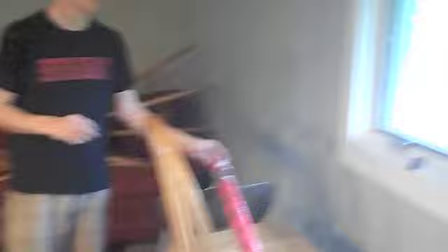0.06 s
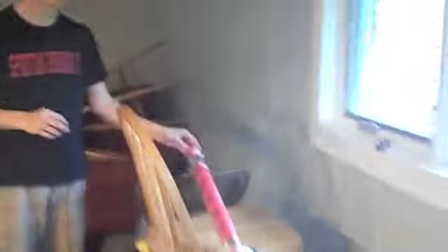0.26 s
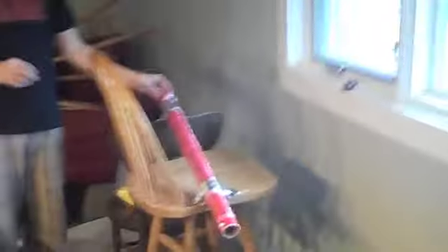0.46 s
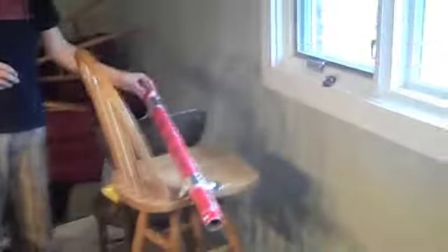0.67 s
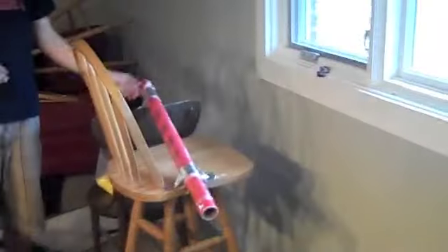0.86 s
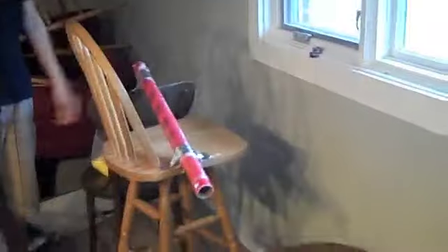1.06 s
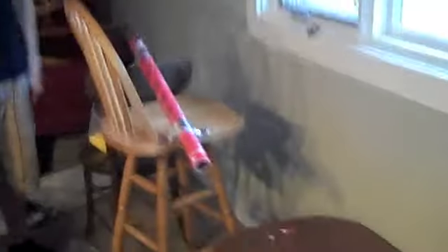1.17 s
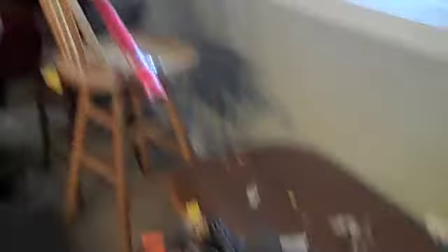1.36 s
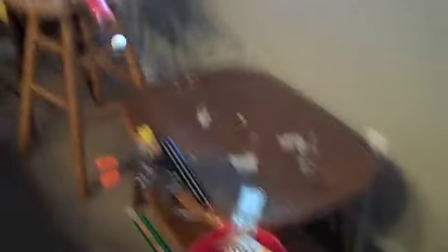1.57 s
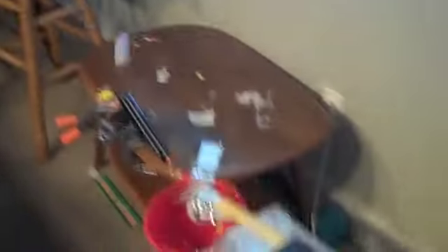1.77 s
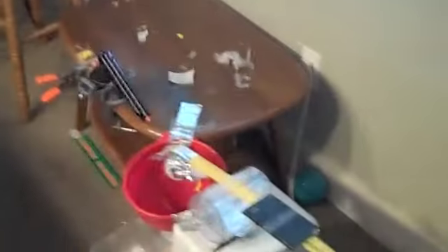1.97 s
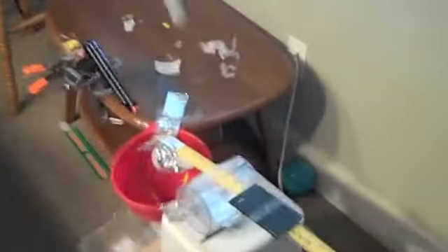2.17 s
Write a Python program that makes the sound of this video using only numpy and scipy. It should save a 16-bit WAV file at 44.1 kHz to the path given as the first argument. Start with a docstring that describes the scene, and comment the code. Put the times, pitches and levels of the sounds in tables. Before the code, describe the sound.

A mousetrap snaps violently on a wooden table, overloading the close microphone; before it, faint clicks and a quiet hollow roll of a golf ball down a tube, then a short room ring.

```python
"""Golf ball trips a mousetrap

A golf ball clicks into a sloping tube and rolls down it: noise bursts, then bumps ringing wall resonances.
Gliding hollow tones sing along. The mousetrap on a wooden table snaps and clatters: noise bursts, ringing
wire modes, a rough spring ring, wooden knocks and a thud. A small living room rings on through a noise
reverb; room tone and low buffeting lie beneath. The snap overloads the microphones."""
import sys
import numpy as np
from scipy import signal
from scipy.fft import rfft, irfft
from scipy.io import wavfile

SR = 44100
rng = np.random.default_rng(int(sys.argv[2]) if len(sys.argv) > 2 else 0)


def store_pcm(level_fs):
    """Save levels as 16-bit WAV."""
    pcm = np.round(np.clip(level_fs, -1, 1) * 32767).astype(np.int16)
    wavfile.write(sys.argv[1], SR, np.atleast_2d(pcm).T)


N = 97593
TIME = np.arange(N) / SR  # s

# left-right similarity of direct sound: (frequency [Hz], correlation [-1..1])
NEAR_CORRELATION = [(100, 1), (900, 1), (2000, 0.97), (4500, 0.41), (8000, 0.87), (13000, 0.062)]
# left-right similarity of diffuse sound: (frequency [Hz], correlation [-1..1])
ROOM_CORRELATION = [(40, 0), (130, 0.33), (500, .92), (900, 0.32), (1500, 0.015), (3000, 0.22), (8000, 0)]
SNAP_HOLD_S = 0.0036  # flat top of each trap burst


def from_db(db):
    """Decibels to gain."""
    return 10 ** (np.asarray(db) / 20)


def rms_one(x):
    """Scale to rms 1."""
    return x / np.sqrt(np.mean(x ** 2) + 1e-20)


def level(rows):
    """Gain over time, linear in dB between (time [s], level [dB]) points."""
    return from_db(np.interp(TIME, *np.transpose(rows)))


def over_bins(points):
    """Read a (frequency [Hz], value) table at every FFT bin, on a log-frequency axis."""
    hz, value = np.transpose(points)
    bin_hz = np.arange(N // 2 + 1) * SR / N
    return np.interp(np.log(bin_hz + 1), np.log(hz), value)


def noise(spectrum, correlation):
    """Coloured stereo noise of rms 1; the mid/side mix sets the left-right correlation per bin."""
    mid, side = rfft(rng.standard_normal((2, N)))
    alike = np.clip(over_bins(correlation), -1, 1)
    pair = np.sqrt(1 + alike) * mid + np.sqrt(1 - alike) * side * [[1], [-1]]
    return rms_one(irfft(pair * from_db(over_bins(spectrum)), N))


def drift(cutoff_hz):
    """Random wander of rms 1: low-passed noise, filter run in for 1 s."""
    sos = signal.butter(2, cutoff_hz, fs=SR, output="sos")
    return rms_one(signal.sosfilt(sos, rng.standard_normal(N + SR))[SR:])


def decay(start_s, t60_s, hold_s=0):
    """Sudden start, short hold, exponential fall."""
    falling_s = np.maximum(TIME - start_s - hold_s, 0)
    return (TIME >= start_s) * np.exp(-np.log(1000) * falling_s / t60_s)


def strike(times_s, gains, hz, t60_s):
    """One damped mode: a two-pole resonator rung by single-sample clicks."""
    clicks = np.zeros(N) + 1e-18
    clicks[(np.asarray(times_s) * SR).astype(int)] = gains
    radius = np.exp(-np.log(1000) / (t60_s * SR))
    angle = 2 * np.pi * hz / SR
    return signal.lfilter([0, np.sin(angle)], [1, -2 * radius * np.cos(angle), radius ** 2], clicks)


def resonate(x, hz, width_hz):
    """Two-pole band-pass with peak gain 1."""
    radius = np.exp(-np.pi * width_hz / SR)
    zeros = np.array([1, 0, -1]) * (1 - radius ** 2) / 2
    poles = [1, -2 * radius * np.cos(2 * np.pi * hz / SR), radius ** 2]
    return signal.lfilter(zeros, poles, x)


def trap_metal(grain_db=1, mode_spread_db=2):
    """Each metal contact is a burst of chatter that rings bar and spring modes; a bright shiver lingers."""
    # metal contacts: (time [s], level [dB], t60 [s])
    snaps = [(1.7134, -21, 0.069), (1.7232, -8, 0.028), (1.7332, -20.5, 0.046), (1.74, -5.5, 0.021),
             (1.7507, -13, 0.035), (1.7541, -15, 0.034), (1.784, -20.5, 0.037)]
    # burst spectrum: (frequency [Hz], level [dB])
    crack_colour = [(200, -31), (450, -13.5), (1000, -5.5), (1600, -5), (2800, -9.5), (3700, -7),
                    (4200, -4), (4700, -5.5), (6400, -1), (7900, 0), (9500, -10), (11500, -16.5),
                    (14000, -21)]
    # modes of wire bar and spring: (frequency [Hz], level [dB], t60 [s])
    wire_modes = [(1373, -30, 0.38), (1680, -39, .42), (1804, -31.5, .24), (2040, -31.5, .12),
                  (3330, -29.5, 0.31), (6110, -28, 0.3), (6340, -23, .16), (7390, -27.5, .18),
                  (7700, -28, 0.19), (8130, -31, 0.24)]
    # shiver spectrum: (frequency [Hz], level [dB])
    shiver_colour = [(300, -19.5), (700, -6), (1800, -0.5), (3000, -8.5), (6200, -3.5), (8300, -13.5),
                     (14000, -31.5)]
    shiver_db, shiver_t60_s = -61.5, 5.4

    times_s, dbs, _ = np.transpose(snaps)
    bursts = sum(from_db(db) * decay(s, t60_s, SNAP_HOLD_S) for s, db, t60_s in snaps)
    crack = bursts * noise(crack_colour, NEAR_CORRELATION)
    crack = crack * rms_one(from_db(grain_db * drift(600)))

    def wire_channel():
        """All modes, each strike randomly stronger or weaker."""
        ring = 0
        for hz, mode_db, t60_s in wire_modes:
            spread_db = mode_spread_db * rng.standard_normal(len(times_s))
            ring = ring + strike(times_s, from_db(dbs + mode_db + spread_db), hz, t60_s)
        return ring

    wire = np.array([wire_channel(), wire_channel()])
    shiver_gain = from_db(shiver_db) * decay(times_s[1], shiver_t60_s)
    return crack + wire + shiver_gain * noise(shiver_colour, ROOM_CORRELATION)


def trap_spring():
    """Short, rough ring of the spring as the bar lands: narrow-band noise with a fast decay."""
    landing_s, spring_db, t60_s = 1.7405, -12, 0.035
    ring = rms_one(resonate(rng.standard_normal(N), hz=4220, width_hz=140))
    return from_db(spring_db) * decay(landing_s, t60_s, SNAP_HOLD_S) * ring


def trap_wood():
    """The base kicks against the table top: pitched board modes and a dull noise thud."""
    # base-on-table knocks: (time [s], level [dB])
    knocks = [(1.7243, -10), (1.7305, -3.5), (1.7330, -1.5), (1.7448, -12)]
    # board modes: (frequency [Hz], level [dB], t60 [s])
    wood_modes = [(277.8, -59.5, 6), (374.6, -25.5, 0.098), (552.4, -20.5, 0.37), (790, -4.5, 0.032),
                  (882, -9, 0.072), (1468, -15.5, 0.055)]
    # thud spectrum: (frequency [Hz], level [dB])
    thud_colour = [(25, -21.5), (75, -27), (150, -7.5), (330, -2.5), (600, -2), (1100, -8), (1800, -3.5),
                   (3000, -25)]
    thud_db, thud_t60_s = -14.5, 0.19
    low_cut_hz = 96  # keeps the knocks free of deep bass

    times_s, dbs = np.transpose(knocks)
    knock = 0
    for k, (hz, mode_db, t60_s) in enumerate(wood_modes):
        knock = knock + (-1) ** k * strike(times_s, from_db(dbs + mode_db), hz, t60_s)
    high_pass = signal.butter(2, low_cut_hz, "high", fs=SR, output="sos")
    thud_gain = from_db(thud_db) * decay(times_s[0], thud_t60_s)
    return signal.sosfilt(high_pass, knock) + thud_gain * noise(thud_colour, NEAR_CORRELATION)


def rolling(wobble_db=1.0, patchy_db=3):
    """Tiny random bumps ring the tube wall in patches; the air inside sings in shifting hollow tones."""
    # rumble strength: (time [s], level [dB])
    roll = [(0.75, -83), (0.9, -66.5), (1.03, -65), (1.17, -62.5), (1.38, -57), (1.43, -57.5), (1.53, -55),
            (1.62, -66.5), (1.71, -78)]
    # tube wall resonances: (frequency [Hz], width [Hz], level [dB])
    tube_modes = [(113, 14, -1), (211, 50, -2), (390.5, 120, -2), (602.7, 180, -5.5), (1090, 530, -18),
                  (2170, 90, -18)]
    # air tones that bend and swell as the ball travels, one list each: (time [s], frequency [Hz], level [dB])
    air_tones = [
        [(1.08, 215, -77), (1.2, 216, -61), (1.33, 225.2, -68.5), (1.42, 206.3, -58), (1.47, 210, -70),
         (1.7, 213.7, -77.5)],
        [(1.0, 349, -75), (1.15, 333.5, -54), (1.23, 332.5, -65.5), (1.31, 354.5, -59), (1.36, 402.4, -55.5),
         (1.42, 431.6, -53.5), (1.47, 416, -62.5), (1.52, 399.5, -56), (1.58, 427.2, -52.5), (1.68, 425, -82)],
        [(1.02, 440.6, -75), (1.1, 441.6, -59), (1.17, 409.7, -64), (1.34, 389.1, -65.5), (1.42, 362.6, -60),
         (1.53, 350, -60.5), (1.64, 350, -77)],
        [(1.06, 1010, -84), (1.28, 1020, -67), (1.34, 1005, -74.5), (1.45, 1015, -66.5), (1.62, 1000, -86.5)],
    ]
    bumps_per_s = 6000

    bumps = (rng.random(N) < bumps_per_s / SR) * rng.standard_normal(N)
    tube = 0
    for k, (hz, width_hz, db) in enumerate(tube_modes):
        patches = from_db(db + patchy_db * drift(10))
        tube = tube + (-1) ** k * patches * resonate(bumps, hz, width_hz)
    rumble = level(roll) * from_db(wobble_db * drift(24)) * rms_one(tube)
    tones = sum(hollow_tone(rows) for rows in air_tones)
    return (rumble + tones) * np.ones((2, 1))


def hollow_tone(rows, rough=0.42, flutter_hz=35):
    """One air resonance of the tube: a gliding sine with random flutter, silent outside its points."""
    s, hz, db = np.transpose(rows)
    phase = 2 * np.pi * np.cumsum(np.interp(TIME, s, hz)) / SR
    flutter = drift(flutter_hz) * np.cos(phase) + drift(flutter_hz) * np.sin(phase)
    tone = rms_one(np.cos(phase) + rough * flutter)
    return from_db(np.interp(TIME, s, db, left=-np.inf, right=-np.inf)) * tone


def jolts():
    """The ball jolts the tube on its stand near the end of the run: soft bumps of a few modes."""
    # jolts: (time [s], level [dB])
    bumps = [(1.453, -56.5), (1.492, -57)]
    # modes of the jolted tube: (frequency [Hz], level [dB], t60 [s])
    modes = [(108, 1, 0.38), (665, 2, .15), (1010, -2, .12), (1850, -7, 0.083)]
    times_s, dbs = np.transpose(bumps)
    return sum(strike(times_s, from_db(dbs + db), hz, t60_s) for hz, db, t60_s in modes)


def handling(grain_db=1.0):
    """The ball clicks and scuffs against the tube: noise bursts, scraping noise and pinging modes."""
    # light contacts: (time [s], bright tick level [dB], hollow clack level [dB])
    taps = [(0.018, -62, -52.5), (0.031, -73, -59.5), (0.07, -65, -60), (0.079, -50, -58),
            (0.093, -56.5, -61), (0.215, -60.5, -60), (0.253, -55, -78), (0.306, -54, -76),
            (0.751, -61, -53.5), (0.7581, -56, -55.5), (0.765, -65, -60.5), (0.771, -65, -56),
            (1.037, -59.5, -80), (1.12, -58, -87), (1.453, -68, -62), (1.535, -61, -73)]
    # tick spectrum: (frequency [Hz], level [dB])
    tick_colour = [(2000, -15), (4500, -18.5), (6300, -4.5), (7700, 4.5), (9000, -7.5), (11000, -15),
                   (14000, -22.5)]
    # clack spectrum: (frequency [Hz], level [dB])
    clack_colour = [(100, -25), (400, -7), (1100, -3), (2600, -6), (3120, -3), (3600, -6), (4800, -2.5),
                    (6500, -4.5), (8200, 1.5), (9500, -20.5), (14000, -24.5)]
    # scuffing along the tube wall: (time [s], level [dB])
    scuff_level = [(0, -73), (0.245, -75.5), (0.257, -61), (0.325, -62.5), (0.37, -82), (1.05, -79),
                   (1.3, -74), (1.39, -68), (1.44, -73.5), (1.52, -67), (1.6, -77.5), (1.71, -72)]
    # scuff spectrum: (frequency [Hz], level [dB])
    scuff_colour = [(500, -7.5), (1500, -4.5), (3500, -5), (5500, -5), (7600, 1), (9500, -8), (14000, -18)]
    # tube pings with some of the taps: (time [s], frequency [Hz], level [dB], t60 [s])
    ping_modes = [(0.019, 4970, -55.5, 0.029), (0.7565, 3090, -51.5, 0.047), (0.7566, 6000, -54, 0.036)]
    hold_s, tap_t60_s = 0.0026, 0.03

    tick_gain = sum(from_db(db) * decay(s, tap_t60_s, hold_s) for s, db, _ in taps)
    clack_gain = sum(from_db(db) * decay(s, tap_t60_s, hold_s) for s, _, db in taps)
    ticks = tick_gain * noise(tick_colour, NEAR_CORRELATION)
    clacks = clack_gain * noise(clack_colour, NEAR_CORRELATION)
    scuff = level(scuff_level) * noise(scuff_colour, NEAR_CORRELATION)
    grain = rms_one(from_db(grain_db * drift(220)))
    pings = sum(strike([s], from_db(db), hz, t60_s) for s, hz, db, t60_s in ping_modes)
    return (ticks + clacks + scuff) * grain + pings


def room(x):
    """Dense reflections build up quickly and die away: convolution with shaped noise of unit energy."""
    # reverb spectrum: (frequency [Hz], level [dB])
    room_colour = [(60, -4.5), (220, 2.5), (500, -2.5), (800, -6.5), (1400, -1), (3000, -1.5), (6500, -4.5),
                   (10000, -2.5), (14000, -2)]
    t60_s, delay_s, build_s = 0.4, 0.0029, 0.0077
    build = 1 - np.exp(-np.maximum(TIME - delay_s, 0) / build_s)
    tail = noise(room_colour, ROOM_CORRELATION) * build * decay(0, t60_s)
    response = rms_one(tail) / np.sqrt(N)
    return signal.fftconvolve(x, response, axes=1)[:, :N]


def room_tone():
    """Steady room air: coloured noise, stronger on the left."""
    # air spectrum: (frequency [Hz], level [dB])
    air_colour = [(15, -36.5), (25, -6.5), (126, -2), (280, -4), (400, -8.5), (1360, -18.5), (4140, -26.5),
                  (14000, -39)]
    air_db, pan_db = -65.5, 3  # left raised and right lowered by pan_db
    pan_gain = from_db([[pan_db], [-pan_db]])
    return from_db(air_db) * pan_gain * noise(air_colour, ROOM_CORRELATION)


def buffeting():
    """Air buffets the moving microphone: low noise that swells."""
    # buffet strength: (time [s], level [dB])
    buffet_level = [(0, -84), (1.5, -75), (1.9, -71), (2.2, -67)]
    # buffet spectrum: (frequency [Hz], level [dB])
    buffet_colour = [(10, -10.5), (28, 0.5), (55, -10), (120, -21.5), (2000, -90.5)]
    return level(buffet_level) * noise(buffet_colour, ROOM_CORRELATION)


def scene():
    """Trap and ball, direct and through the room, over the background."""
    # (source, reverb send [dB])
    sources = [(trap_metal(), -7), (trap_spring(), -20.5), (trap_wood(), -12.5),
               (rolling() + jolts(), -9), (handling(), -6)]
    direct = sum(x for x, _ in sources)
    echoes = room(sum(from_db(wet_db) * x for x, wet_db in sources))
    return direct + echoes + room_tone() + buffeting()


def record(dry):
    """Two microphones: left lag, treble colour, soft overload, steep top cut."""
    # left treble response: (frequency [Hz], gain [dB])
    left_mic = [(1000, 0.73), (4200, 1.3), (6300, 0), (7800, 4), (10000, 3.5), (14000, 1)]
    # right treble response: (frequency [Hz], gain [dB])
    right_mic = [(1000, 1.6), (4200, 1.67), (6500, 5), (8000, -8), (9300, -1), (14000, -9)]
    left_lag_s, ceiling, cutoff_hz = 0.00002, 0.92, 14200
    bin_hz = np.arange(N // 2 + 1) * SR / N
    lag = np.exp(-2j * np.pi * bin_hz * np.array([[left_lag_s], [0]]))
    colour = from_db([over_bins(left_mic), over_bins(right_mic)])
    heard = irfft(rfft(dry) * lag * colour, N)
    overloaded = ceiling * np.tanh(heard / ceiling)
    low_pass = signal.ellip(10, 0.2, 70, cutoff_hz, fs=SR, output="sos")
    return signal.sosfilt(low_pass, overloaded)


dry = scene()
out = record(dry)
store_pcm(out)
```